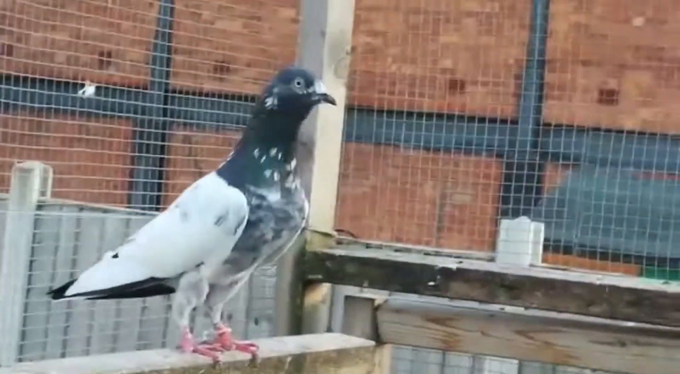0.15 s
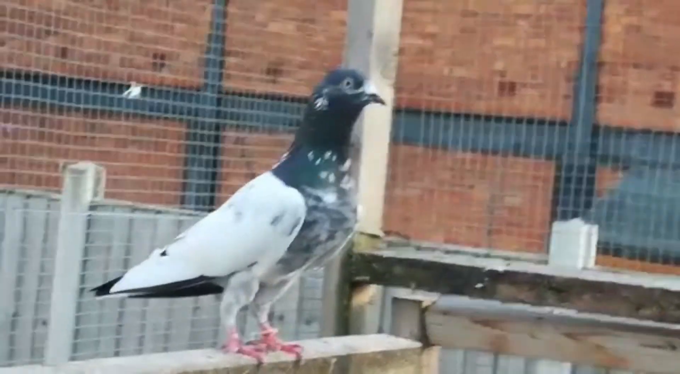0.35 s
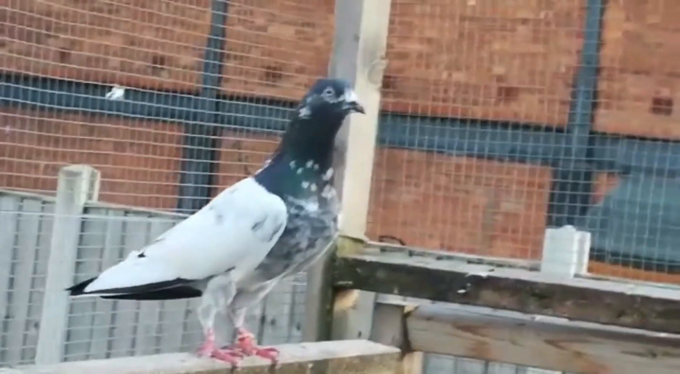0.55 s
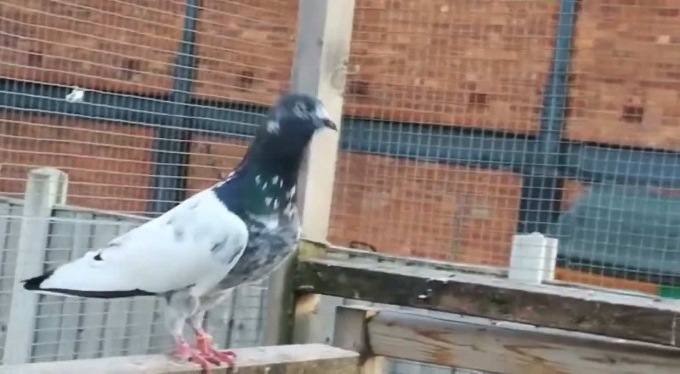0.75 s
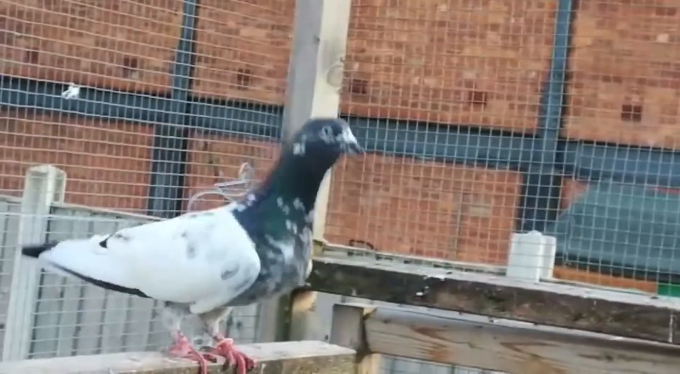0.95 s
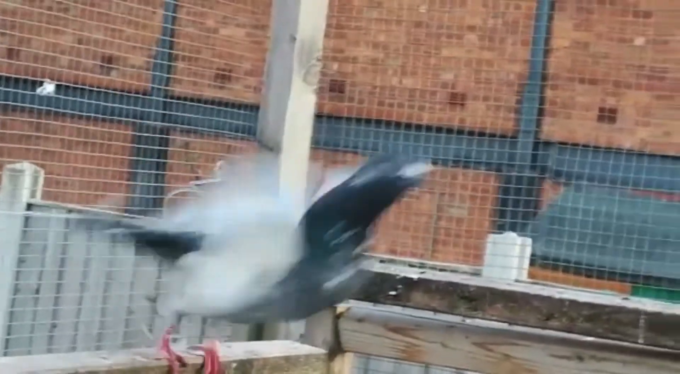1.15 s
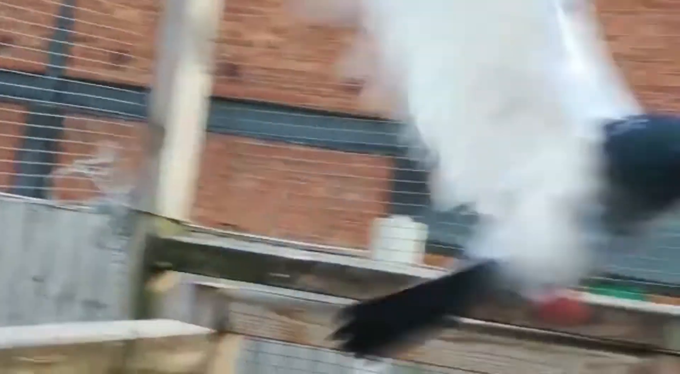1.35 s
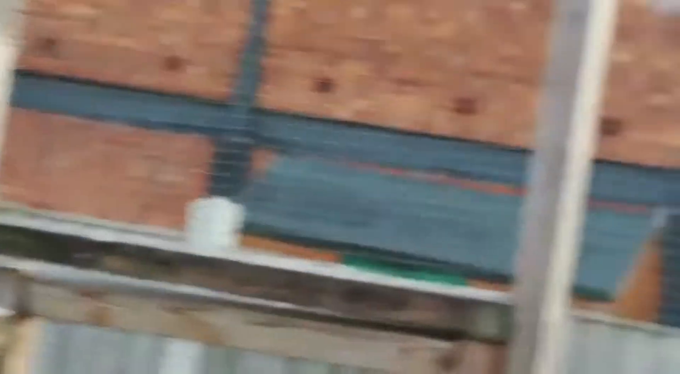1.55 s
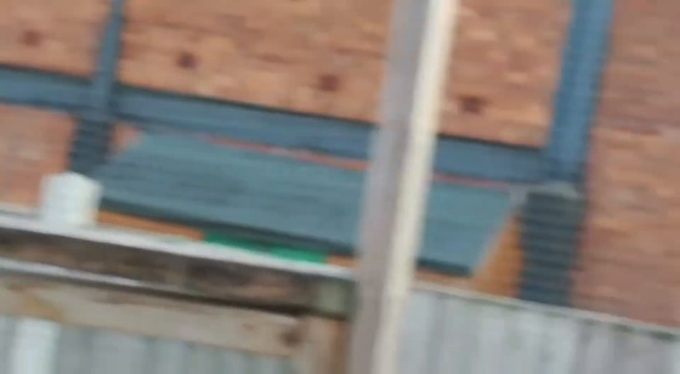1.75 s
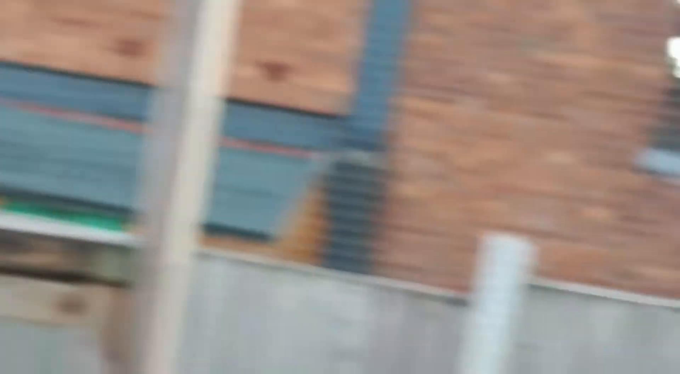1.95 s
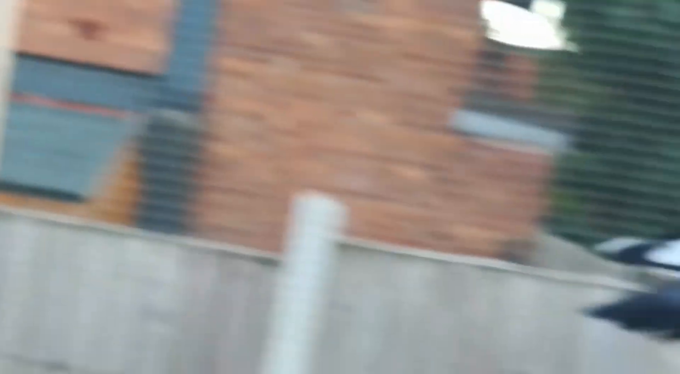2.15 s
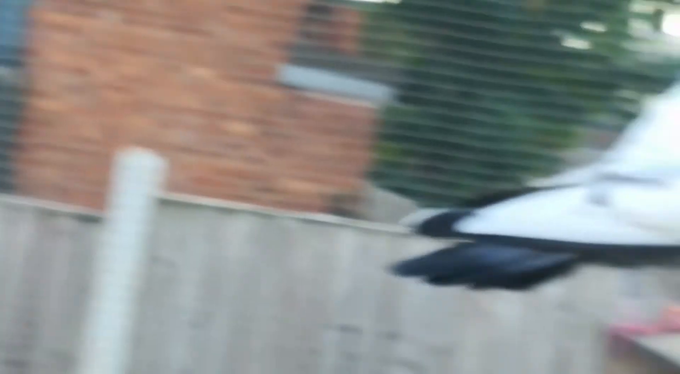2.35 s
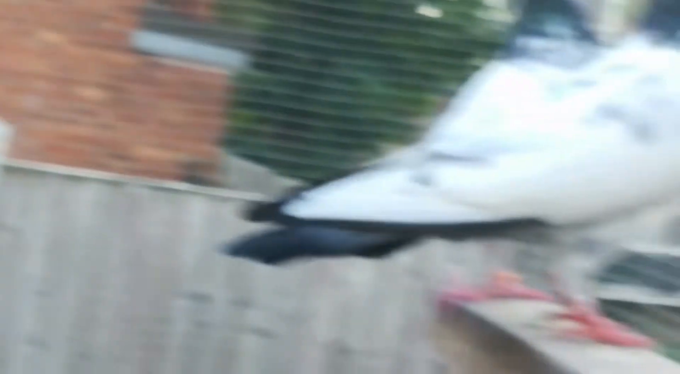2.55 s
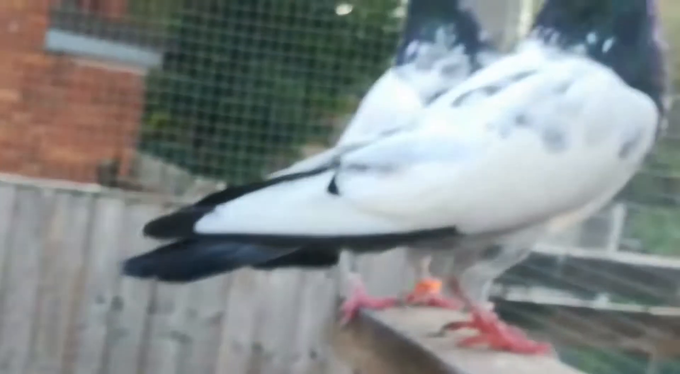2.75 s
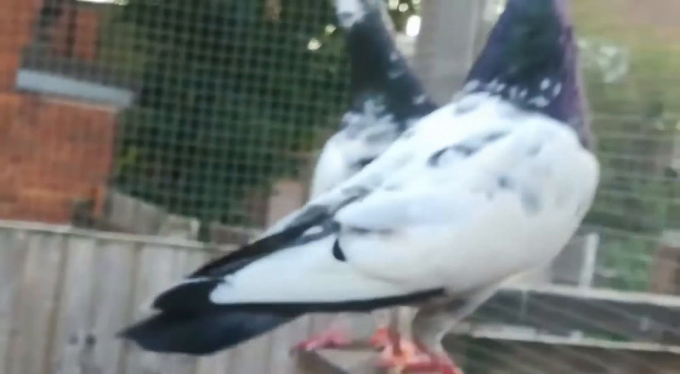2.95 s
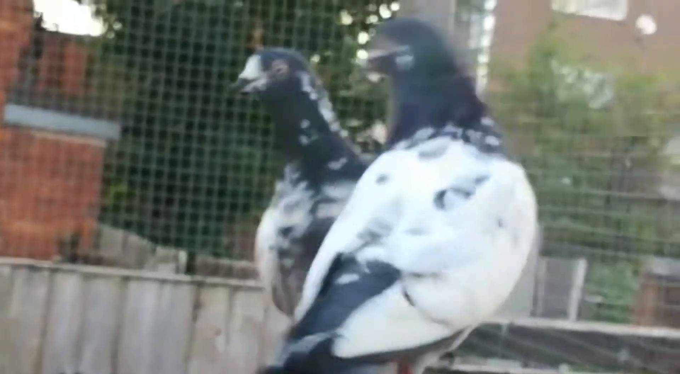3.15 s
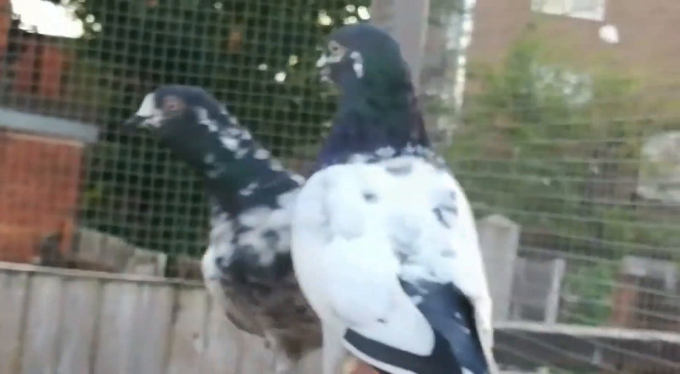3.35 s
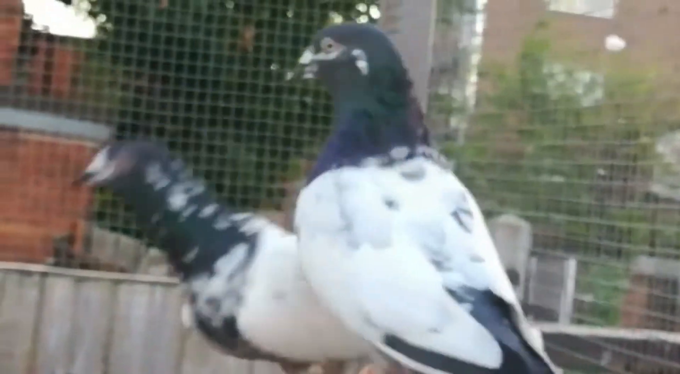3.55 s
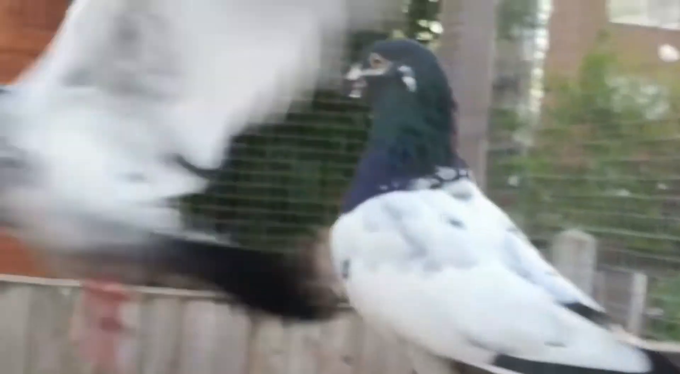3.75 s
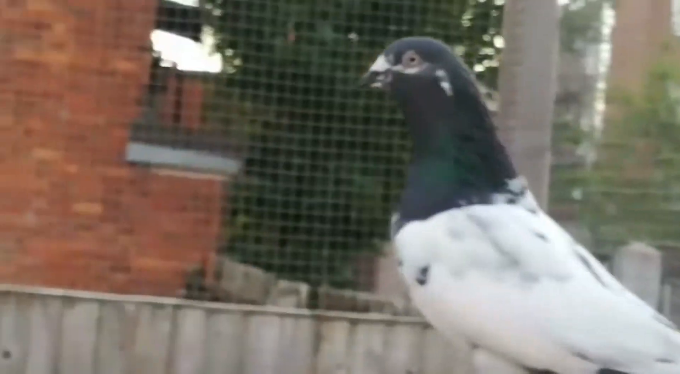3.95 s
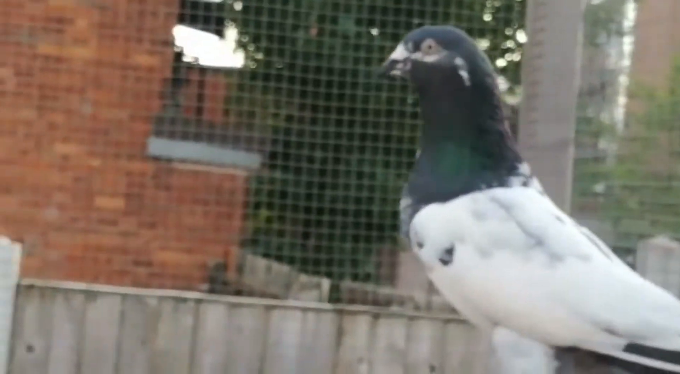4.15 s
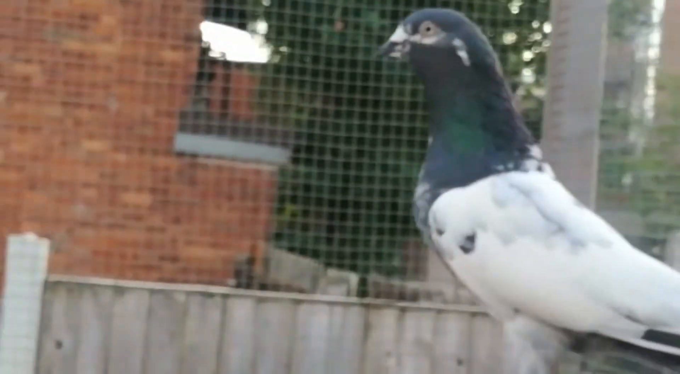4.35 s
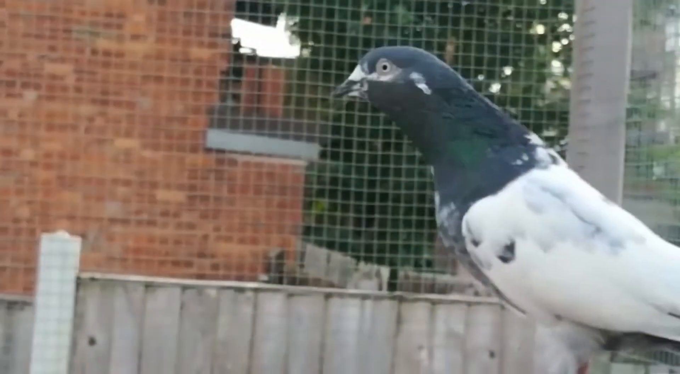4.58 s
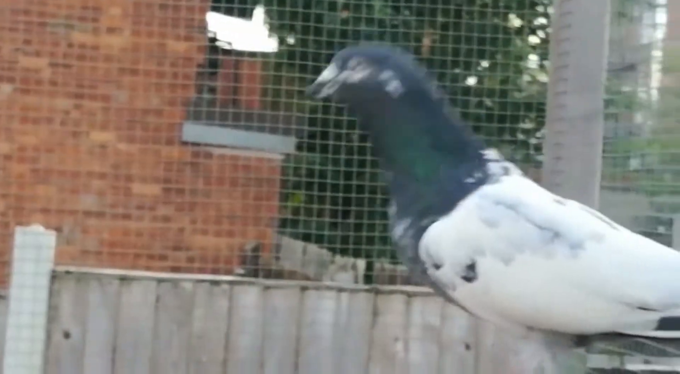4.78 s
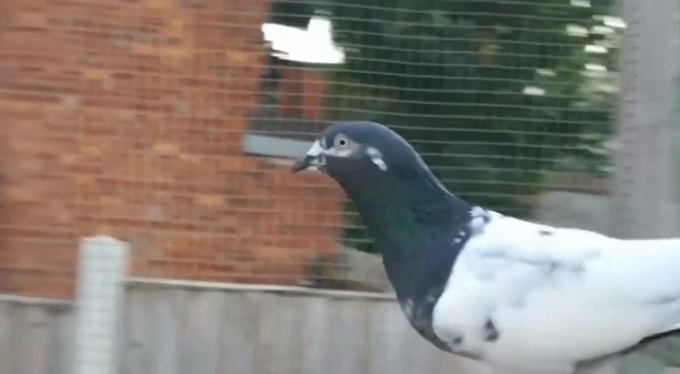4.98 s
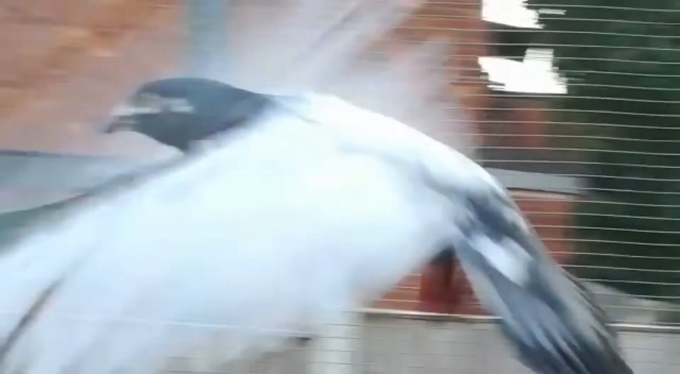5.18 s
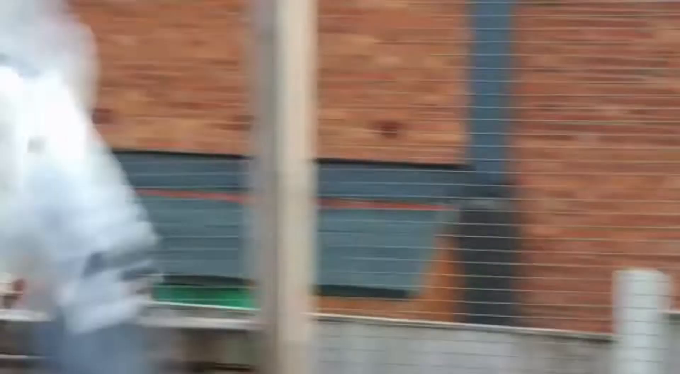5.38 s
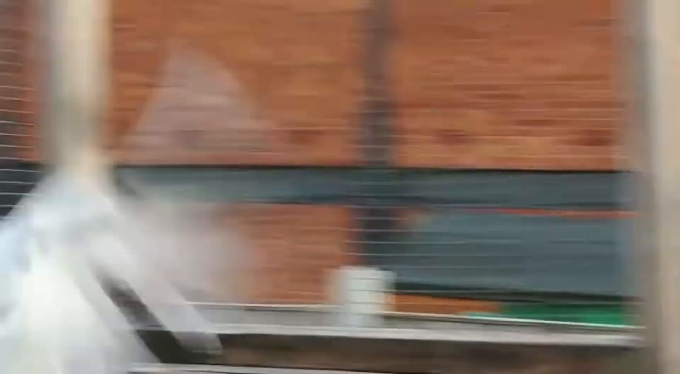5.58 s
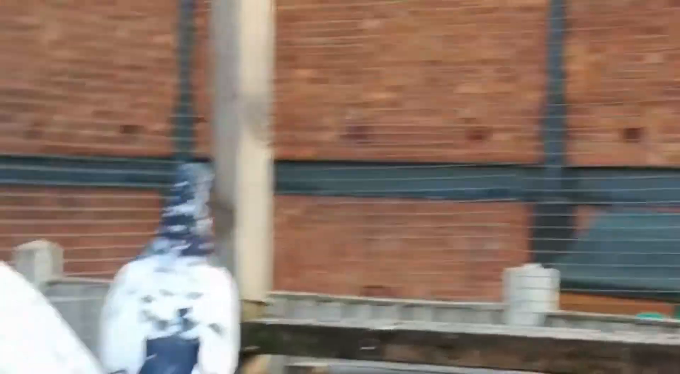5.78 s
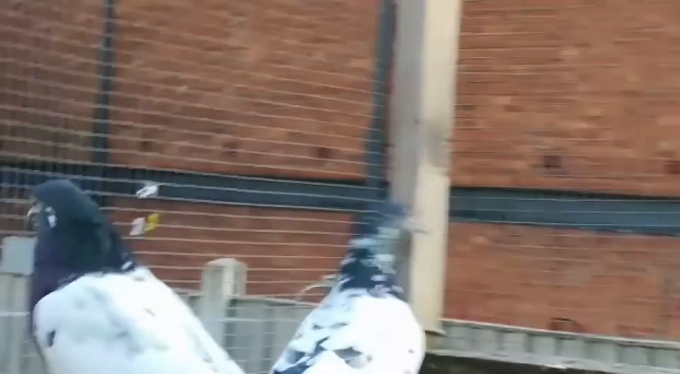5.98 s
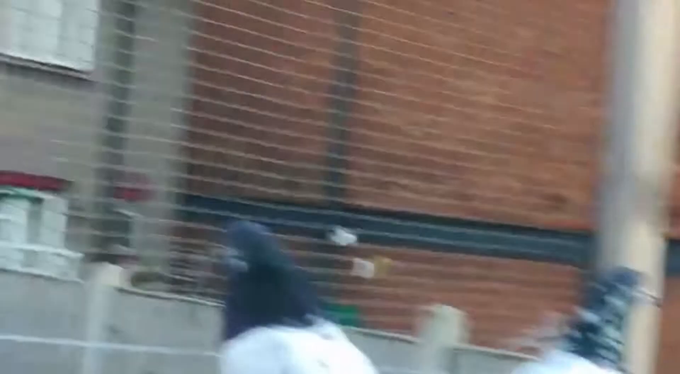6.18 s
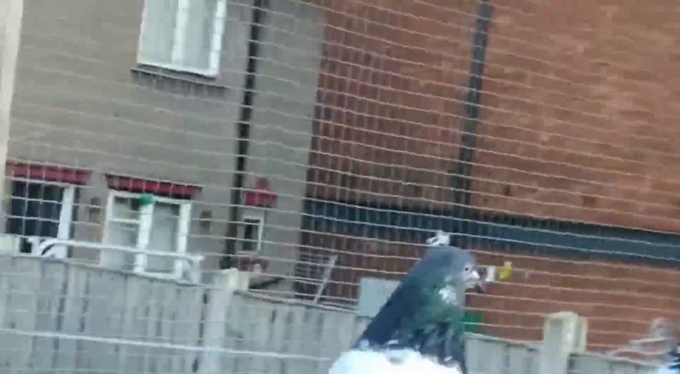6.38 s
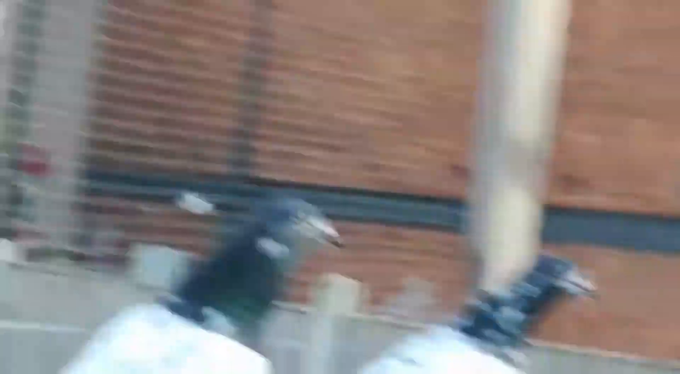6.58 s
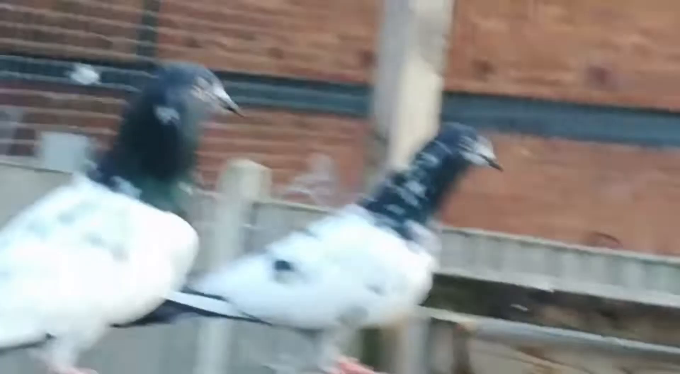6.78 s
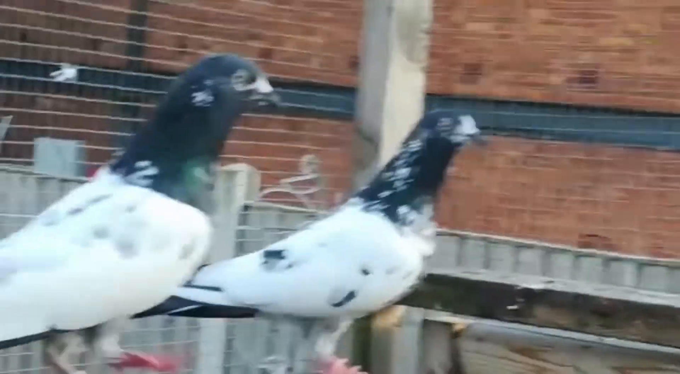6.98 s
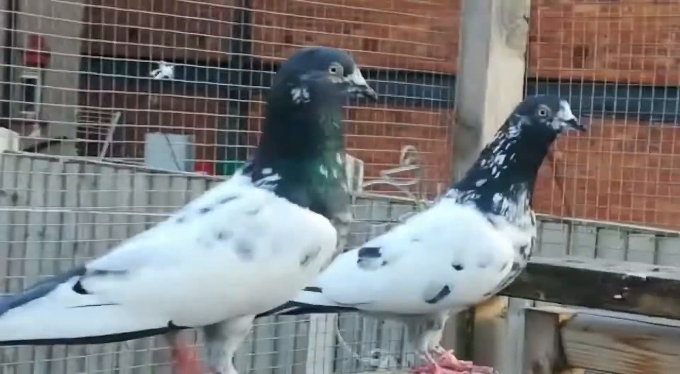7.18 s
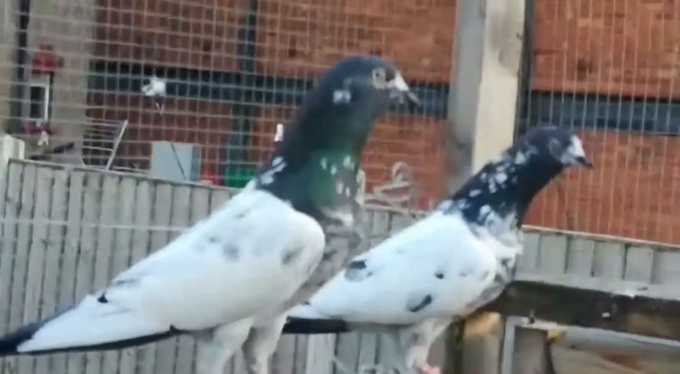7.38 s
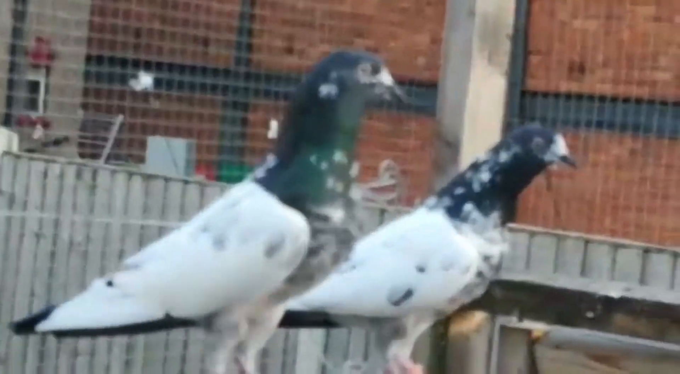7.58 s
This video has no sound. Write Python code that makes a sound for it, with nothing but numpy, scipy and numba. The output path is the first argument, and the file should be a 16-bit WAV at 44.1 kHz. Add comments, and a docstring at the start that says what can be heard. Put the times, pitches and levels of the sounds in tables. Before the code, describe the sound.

Close stereo sound of pigeons in an outdoor wire aviary. Soft coos and a small flutter lead to a loud cracking take-off just after one second, then deep gusts thump the microphone. Feathers rustle, feet tap wooden perches, another lighter flight passes near four seconds, and a strong burst of flaps follows just after five. It settles into quiet yard noise, low hum, faint coos and a thin far whistle.

```python
"""A wire aviary, with pigeons a metre or two from two microphone ports: wings clap with noise cracks, rustle in
flickering noise bands and whistle as rough gliding tones. Feet ring the modes of wooden perches, a bird
coos in purring tones and a small bird whistles far off. Air buffets the ports as low-passed noise,
over two wavering low tones of hum and the shaped noise of the yard."""
import sys
import numpy as np
from scipy import signal
from scipy.fft import rfft, irfft, next_fast_len
from scipy.io import wavfile
from scipy.ndimage import uniform_filter1d
from numba import njit

SR = 44100
rng = np.random.default_rng(int(sys.argv[2]) if len(sys.argv) > 2 else 0)


def to_wav(sig):
    """Store sig (one row per channel, or 1-D mono) as 16-bit WAV at the path in sys.argv[1].

    Samples outside -1..1 are clipped; the rate is SR.
    """
    pcm = np.clip(np.atleast_2d(sig), -1, 1) * 32767
    pcm = np.round(pcm).astype(np.int16)
    wavfile.write(sys.argv[1], SR, pcm.T)  # frames by channels


N = 336483
T = np.arange(N) / SR

# spectrum of feather noise: [f/Hz, density/dB]
FEATHER_SPECTRUM = [(550, -14), (1100, -6.5), (2300, -9), (3200, -4.5), (6500, 0), (10000, -11.5),
                    (16000, -13)]


def undb(db):
    """Turn decibels into an amplitude factor."""
    return 10 ** (np.asarray(db) / 20)


def unit(x):
    """Scale a signal to an RMS of one."""
    return x / np.sqrt(np.mean(x ** 2))


def colour(x, points):
    """Equalise a signal along (f/Hz, gain/dB) points, joined on a log frequency axis."""
    n = next_fast_len(N + SR)
    hz, db = np.transpose(points)
    bin_hz = np.arange(n // 2 + 1) * SR / n
    gain = undb(np.interp(np.log(bin_hz + 1), np.log(hz), db))
    return irfft(rfft(x, n) * gain, n)[..., :N]


@njit
def svf(x, hz, damp):
    """State-variable filter with a moving centre; rows: low-pass, band-pass."""
    y, band, low = np.empty((2, len(x))), 0., 0.
    for i in range(len(x)):
        g = np.tan(np.pi * hz[i] / SR)
        v = (band + g * (x[i] - low)) / (1 + g * (g + damp))
        y[0, i] = low + g * v
        y[1, i] = damp * v
        band, low = 2 * v - band, low + 2 * g * v
    return y


def walk(rate):
    """Random levels held 1 / rate s and slewed twice; spread near 1."""
    hold = int(SR / rate)
    steps = np.repeat(rng.standard_normal(N // hold + 1), hold)
    slewed = uniform_filter1d(uniform_filter1d(steps, hold), hold)
    return unit(slewed[:N])


def ports(pair, alike_hz, pan_db):
    """Both ports share the bass of the first sound; above alike_hz each hears its own."""
    low = signal.lfilter(*signal.butter(1, alike_hz, fs=SR), pair[0] - pair[1])
    pan = undb(np.reshape([pan_db, -pan_db], (2, -1)) / 2)
    return np.array([pair[0], pair[1] + low]) * pan


def lag_left(x, lag_s):
    """The left port hears the sound lag_s later."""
    return np.array([np.interp(T - lag_s, T, x), x])


def add(out, x, s):
    """Mix x into out from time s."""
    i = int(s * SR)
    out[..., i:i + x.shape[-1]] += x[..., :N - i]


def notes(table, waver, burble_db, breath, width, overtones, purr, bend):
    """Short gliding notes: a wavering tone with air noise in a band around it, burbling in level."""
    purr_hz, roll_per_s = 109.96, 17.5  # throat flutter that makes side tones; syllables of the roll
    out = np.zeros(N)
    wobble, burble = 1 + waver * walk(70), undb(burble_db * walk(60))
    for s, length, first_hz, last_hz, db in table:
        on = (T >= s) & (T < s + length)
        u = (T[on] - s) / length
        hz = first_hz + (last_hz - first_hz) * u ** bend
        phase = 2 * np.pi * np.cumsum(hz * wobble[on]) / SR
        tone = np.sin(phase) + overtones * (np.sin(2 * phase) + overtones * np.sin(3 * phase))
        purr_phase = 2 * np.pi * np.cumsum(purr_hz * wobble[on] ** 4) / SR
        tone = tone * (1 + purr * np.sin(purr_phase))
        tone = tone * (1 - purr * np.cos(2 * np.pi * roll_per_s * (T[on] - s)))
        noise = rng.standard_normal(len(u))
        air = svf(svf(noise, hz, width)[1], hz, width)[1]
        note = unit((unit(tone) + breath * unit(air)) * burble[on])
        out[on] += note * undb(db) * np.sin(np.pi * u) ** 0.26
    return out


def air_level_db():
    """The breeze, or a puff where one stands above it: a sudden rise, a hold and a slower fall."""
    # steady breeze on the ports: [t/s, level/dB]
    breeze = [(0, -51), (.43, -63), (1.17, -58.5), (1.47, -48), (1.84, -49.5), (1.9, -35), (2.8, -40),
              (3.65, -43), (4.07, -44.5), (4.24, -58.5), (5.12, -45.5), (6.5, -49.5), (7.63, -50)]
    # puffs of air that hit the ports: [t at full strength/s, level/dB, hold/s]
    puffs = [(1.562, -38, 0.059), (1.873, -27, 0.052), (2.037, -26, 0.059), (2.178, -28, 0.017),
             (2.24, -26, 0.0077), (2.354, -30.5, 0.031), (2.448, -28.5, 0.063), (2.557, -33.5, 0.065),
             (2.866, -30, 0.018), (3.143, -34.5, 0.032), (7.209, -42.5, 0.22)]
    rise_db_per_s, fall_db_per_s = 691.5, 291.5
    s, db, hold_s = np.transpose(puffs)[:, :, None]
    rise_db = rise_db_per_s * np.maximum(s - T, 0)
    fall_db = fall_db_per_s * np.maximum(T - s - hold_s, 0)
    puffs_db = db - rise_db - fall_db
    return np.maximum(puffs_db.max(axis=0), np.interp(T, *np.transpose(breeze)))


def buffeting():
    """Lumpy eddies; a stronger gust reaches higher and is heard later at the left port."""
    db = air_level_db()
    strength = np.clip((db + 55.5) / 30, 0, 1)
    lumps_db = 1.97 * strength * walk(70)
    edge_hz = 65 * (1 + 2.1 * strength ** 2) * undb(0.4 * lumps_db)
    eddies = svf(rng.standard_normal(N), edge_hz, 1.8)[0]
    eddies = svf(eddies, 1.88 * edge_hz, 1.5)[0]
    air = eddies * undb(lumps_db) / np.sqrt(edge_hz)
    air = signal.sosfilt(signal.butter(2, 40, "high", fs=SR, output="sos"), air)
    return lag_left(unit(air) * undb(db), 0.00093 * np.sqrt(strength))


def hum():
    """Two low tones that waver in pitch and level."""
    # level path of each hum: [t/s, upper hum level/dB, lower hum level/dB]
    hum_levels = [(0, -79, -60), (.9, -49.5, -70), (2.199, -61.5, -43), (3.5, -49.5, -42), (4.3, -60, -51),
                  (4.65, -56.5, -41.5), (4.9, -74.5, -60), (5.148, -43, -41), (6.0, -47, -48.5),
                  (6.1, -81, -42), (7.63, -53.5, -46)]
    s, *levels = np.transpose(hum_levels)
    out = 0
    for hz, db, waver in zip((94, 38.8), levels, (.015, .1)):
        level = undb(np.interp(T, s, db) + 2.0 * walk(4.2))
        phase = 2 * np.pi * np.cumsum(hz * (1 + waver * walk(5.2))) / SR
        out = out + level * np.sin(phase)
    return out


def yard():
    """Half-octave bands of distant noise that flicker alone."""
    # spectrum of the yard: [f/Hz, density/dB]
    yard_spectrum = [(150, -3), (250, -2), (500, -14), (1000, -15), (2500, -24), (6000, -23), (16000, -36)]
    treble_db = -63.5  # level above 500 Hz
    out = 0
    for hz in 150 * 2 ** np.arange(0, 7, .5):
        band = np.array([svf(rng.standard_normal(N), np.full(N, hz), 0.64)[1] for _ in range(2)])
        out = out + band / np.sqrt(hz) * undb(1.0 * walk(14))
    # the bands sum to a pink slope: lift it level before shaping
    lift = [(0, 10 * np.log10(hz)) for hz, _ in yard_spectrum]
    out = colour(out, np.array(yard_spectrum) + lift)
    treble = signal.sosfilt(signal.butter(4, 500, "high", fs=SR, output="sos"), out)
    return ports(out, 290, 0.) * undb(treble_db) / np.sqrt(np.mean(treble ** 2))


def coos():
    """Inflated crops hum softly behind closed beaks with a purr; first from the right, later from the left."""
    # coos and murmurs: [t/s, length/s, first f/Hz, last f/Hz, level/dB]
    coo_notes = [(0, 0.039, 745, 757, -41), (.73, 0.062, 357, 412, -55.5), (.835, 0.17, 372.8, 386.5, -51),
                 (.96, 0.081, 314.6, 265, -54), (1.07, 0.12, 472.6, 291, -51.5),
                 (1.165, 0.083, 371, 299, -48.5), (2.28, 0.28, 551, 650, -48.5), (2.55, 0.2, 720, 896, -54),
                 (4.93, 0.26, 220.2, 238, -54.5), (6.055, 0.044, 792, 780, -52),
                 (6.13, 0.202, 344.3, 397.6, -48.5), (6.33, 0.073, 579, 638, -51),
                 (6.5, 0.19, 341.6, 272, -60), (6.52, 0.26, 570, 760, -61.5), (7.33, 0.26, 480, 508, -63)]
    voice = notes(coo_notes, waver=0.025, burble_db=2.5, breath=0.85, width=0.4,
                  overtones=0.25, purr=.7, bend=1)
    return lag_left(voice, np.where(T < 4, .0005, -.0004))


def wings():
    """Tips meet in a dense burst of cracks lasting milliseconds; then the vanes brush raggedly."""
    # wing beats: [t/s, beat level/dB, brushing level against the beat/dB, gain below body_hz/dB]
    beats = [(0.0005, -40, -5, 8.5), (0.103, -28, -15.5, 0), (0.2206, -25.5, -18, 6.5),
             (0.409, -37.5, -26, 9.5), (1.198, -38, 0, -8), (1.2463, -12.5, -22, 2.5),
             (1.337, -18.5, -18.5, 4), (1.393, -1.5, -24, 1), (1.485, -16.5, -19.5, -0.5),
             (1.676, -38.5, 3, -6), (1.702, -23, -22, -33), (2.646, -26.5, -10, -1),
             (2.789, -30, -22.5, -8), (2.846, -29.5, -35, -8), (2.959, -36.5, -13, -5),
             (3.012, -27, -30, -10), (3.2238, -31.5, -20, -1), (3.345, -44.5, -7, 7), (3.493, -35, -21, -6),
             (3.633, -27.5, -24.5, 10), (3.745, -31, -15.5, 7.5), (3.809, -39, -4.5, 1),
             (3.906, -24, -21, 4.5), (3.9772, -18.5, -20, 0), (4.015, -31.5, -9.5, 9),
             (4.0738, -24, -18.5, -4), (4.145, -28, -16, 3), (4.3067, -22, -18, -3.5),
             (4.334, -26, -41, -3), (4.727, -41.5, -14.5, -5), (5.0439, -34.5, -8.5, -5),
             (5.111, -17, -13, -12), (5.1594, -13.5, -32, 2.5), (5.265, -20.5, -17.5, 3),
             (5.326, -7, -28.5, 5.5), (5.426, -18, -13.5, 3.5), (5.4867, -8, -33.5, 4.5),
             (5.618, -25, -17.5, 5), (5.74, -47, -2, -12), (6.37, -33, -20, 8.5),
             (6.6664, -38, -19.5, 13.5)]
    # place of the wings: [t/s, left minus right level/dB]
    side_db = [(0, -2), (1.2, 2.5), (1.7, -1), (3.63, -8), (3.9, 2.5), (4.3, 6), (5.1, -10), (5.2, 3)]
    body_hz, cracks_per_s, brush_s = 2940, 4000, 0.042  # crack rate of the hardest beat
    claps, brushing = np.zeros((2, 2, N))
    t = np.arange(int(.3 * SR)) / SR
    for s, db, brush_db, body_db in beats:
        # gentle beats clap weakly, with a slower start and finer, denser cracks
        hard = min(undb(0.13 * (db + 0.5)), 1)
        when, size = rng.random(len(t)), rng.standard_normal((2, len(t)))
        share = min(cracks_per_s / SR / hard ** 3, 1)
        cracks = (when < share) * size / np.sqrt(share)
        fence_echoes = size * undb(-11) * np.exp(-t / 0.024)
        onset = np.minimum(t * hard ** 3 / 0.0015, 1)
        clap = onset * (cracks / (1 + (t / 0.004) ** 4) + fence_echoes)
        brush = rng.standard_normal((2, len(t))) * undb(brush_db)
        brush = brush / (1 + (t / brush_s) ** 1.2) * np.minimum(t / 0.0075, 1)
        # each stroke has its own colour
        bins = np.linspace(0, 30, len(t) // 2 + 1)
        patchy = undb(3 * np.interp(bins, np.arange(31), rng.standard_normal(31)))
        for out, x in ((claps, hard * clap), (brushing, brush)):
            body = signal.filtfilt(*signal.butter(3, body_hz, fs=SR), x)
            stroke = irfft(rfft(x - body * (1 - undb(body_db))) * patchy)
            add(out, stroke * (1 - t / t[-1]) * undb(db), s)
    # different vanes take turns, so each band of the rustle comes and goes alone
    ragged_db = 2.0 * walk(250)
    rustle = 0
    for hz in 600 * 1.35 ** np.arange(12):
        band = np.array([svf(side, np.full(N, hz), .35)[1] for side in brushing])
        rustle = rustle + band * undb(ragged_db + 3.7 * walk(65))
    feathers = colour(claps * undb(2.0) + rustle, FEATHER_SPECTRUM)
    return undb(-3.5) * ports(feathers, 2000, np.interp(T, *np.transpose(side_db)))


def knocks():
    """Each step rings the perch, most near the pitch of the spot struck; the foot scrapes on for a moment."""
    # feet on the perches: [t/s, level/dB, strongest ring f/Hz]
    steps = [(0.216, -40.5, 1230), (.243, -39.5, 2280), (1.682, -35, 1310), (1.878, -53.5, 1534),
             (3.012, -53, 1550), (3.636, -44, 910), (3.728, -35.5, 780), (4.331, -43, 1800),
             (5.046, -52, 2140), (5.113, -43.5, 1680), (5.745, -56, 2500), (6.668, -60, 1329)]
    # modes of the perch: [f/Hz, level/dB]
    perch_modes = [(894, 2), (1087, 3), (1534, 4), (1771, -1), (2008, 2), (2309, -1), (2557, 1), (2810, -2)]
    out = np.zeros((2, N))
    t = np.arange(int(.3 * SR)) / SR
    for s, db, spot_hz in steps:
        for hz, mode_db in perch_modes:
            scrape = rng.standard_normal((2, len(t))) * np.exp(-t / 0.021)
            t60_s = 0.17 * np.sqrt(1000 / hz)  # higher modes die sooner
            pole = np.exp(2j * np.pi * hz / SR - np.log(1000) / (t60_s * SR))
            ring = signal.lfilter([1], [1, -pole], scrape).imag
            near_db = -min(35 * abs(np.log2(hz / spot_hz)), 17)
            add(out, ring * undb(db - 27.5 + mode_db + near_db), s)
    return out


def far_bird():
    """A thin whistle swells, then sags and blurs as it fades, with a weaker tone above; distance smears it."""
    # whistles: [t/s, f/Hz, level/dB, sag and flutter as a share of f]
    cheeps = [(0.421, 5210, -67.5, 0.013), (2.3, 5140, -66.5, .012), (4.75, 5240, -67.5, 0.0072),
              (6.274, 5210, -62.5, 0.023)]
    out = np.zeros((2, N))
    length_s = .32
    u = np.arange(int(length_s * SR)) / (length_s * SR)
    for s, hz, db, flutter in cheeps:
        for ratio, share_db in ((1, 4), (1.08, -2)):
            bend = 1 - flutter * u ** 2 + flutter * u * walk(300)[:len(u)]
            phase = 2 * np.pi * np.cumsum(hz * ratio * bend) / SR
            # many paths blur the line
            smear = 1 + 0.84 * np.array([walk(201)[:len(u)] for _ in out])
            add(out, np.sin(phase) * np.sin(np.pi * u) ** 2 * smear * undb(db + share_db), s)
    return out


def wing_tones():
    """Flight feathers flutter on the downstroke: a rough rising tone in a rush of air, more on the right."""
    # flutters: [t/s, length/s, first f/Hz, level/dB]
    flutters = [(1.271, 0.081, 528, -48), (1.43, 0.062, 567.5, -45.5), (3.861, 0.047, 538, -46),
                (5.215, 0.057, 510, -47)]
    rise = 1.5  # last pitch over first pitch
    glides = [(s, length, hz, hz * rise, db) for s, length, hz, db in flutters]
    flutter = notes(glides, waver=0.0346, burble_db=3.0, breath=0.73, width=0.87,
                    overtones=0.36, purr=0, bend=0.68)
    envelope = uniform_filter1d(np.abs(flutter), 400)
    rush = colour(rng.standard_normal((2, N)) * envelope, FEATHER_SPECTRUM)
    return flutter * undb([[-3], [3]]) + undb(6.5) * rush


def scene():
    """Mix the birds with the air, the hum and the yard."""
    birds = wings() + knocks() + wing_tones() + coos()
    return birds + far_bird() + buffeting() + hum() + yard()


def record(dry):
    """The two ports colour the sound a little differently; the loudest claps are rounded and the top is cut."""
    # colour of the ports: [f/Hz, left minus right level/dB]
    left_tilt = [(300, 0.5), (2500, -3.5), (8000, 5), (15000, 3)]
    tilt = np.array(left_tilt) * [1, .5]  # half to each port
    wet = np.array([colour(dry[0], tilt), colour(dry[1], tilt * [1, -1])])
    top_cut = signal.ellip(8, .2, 70, 15800, fs=SR, output="sos")
    return signal.sosfilt(top_cut, np.tanh(wet))


dry = scene()
out = record(dry)
to_wav(out)
```